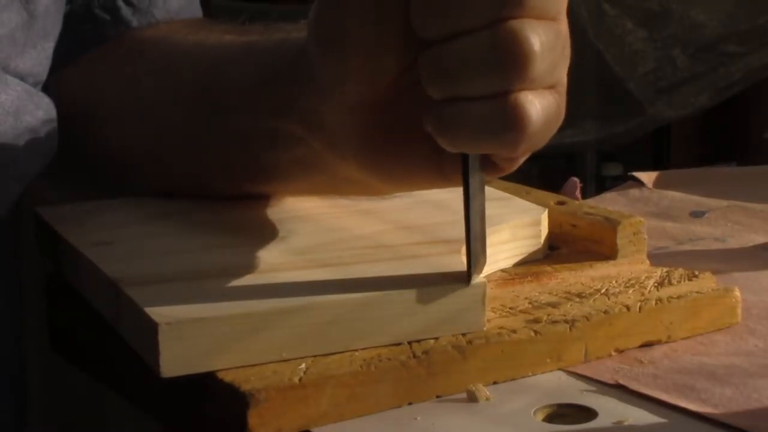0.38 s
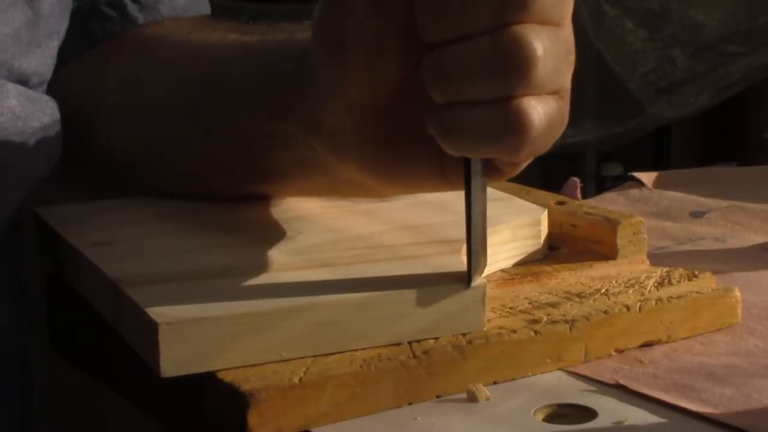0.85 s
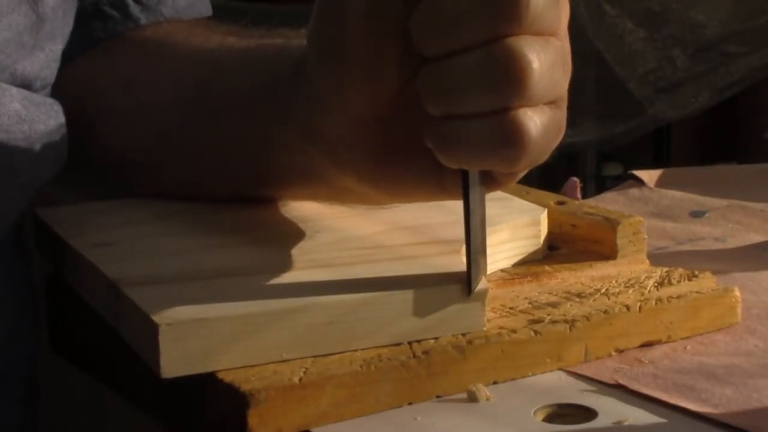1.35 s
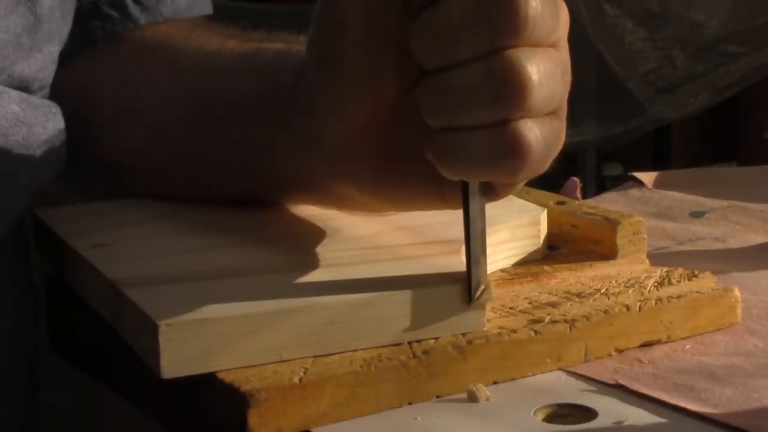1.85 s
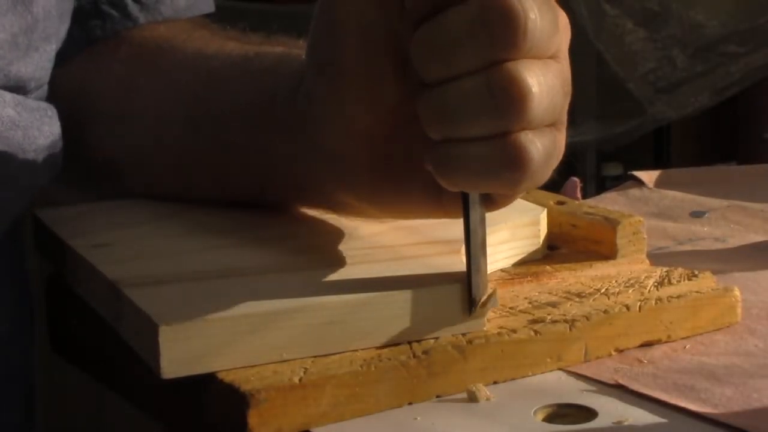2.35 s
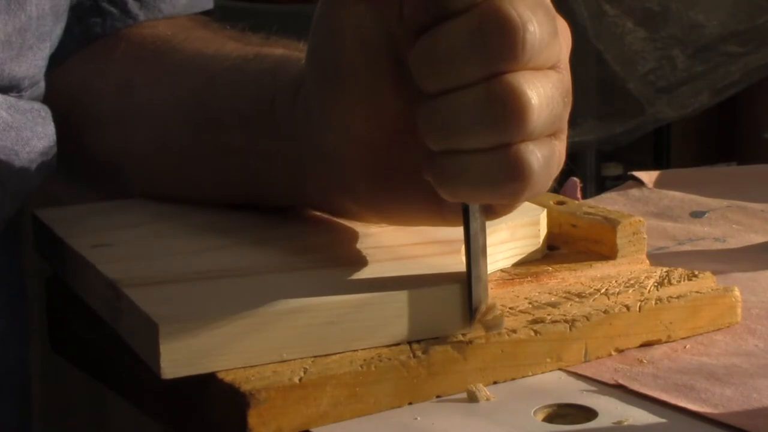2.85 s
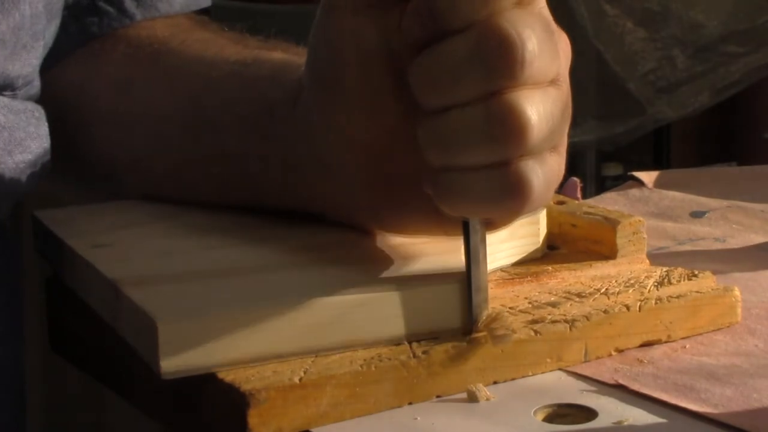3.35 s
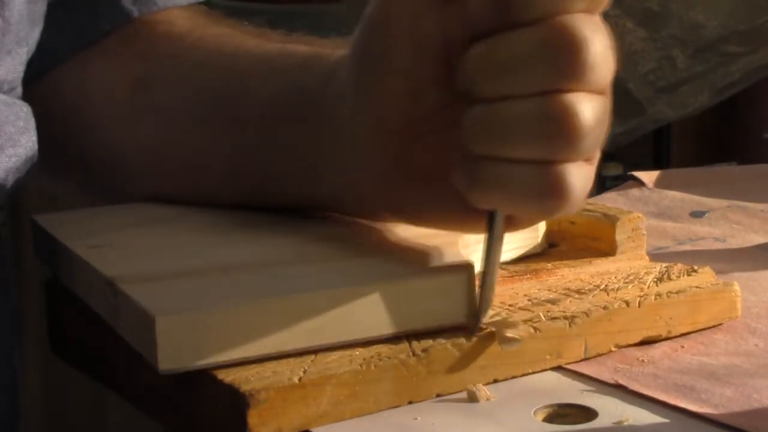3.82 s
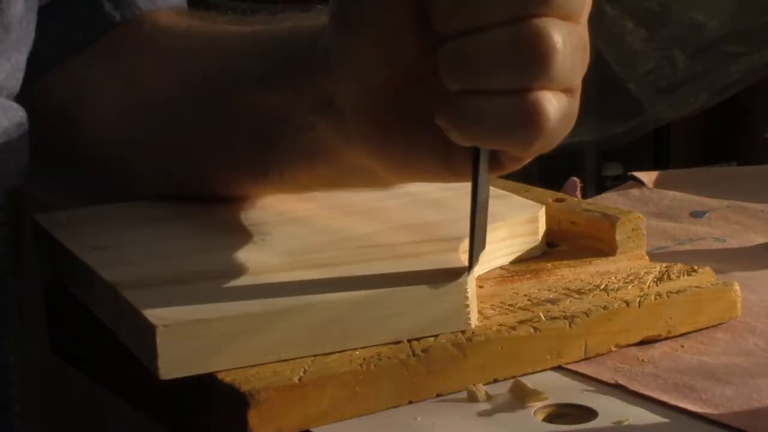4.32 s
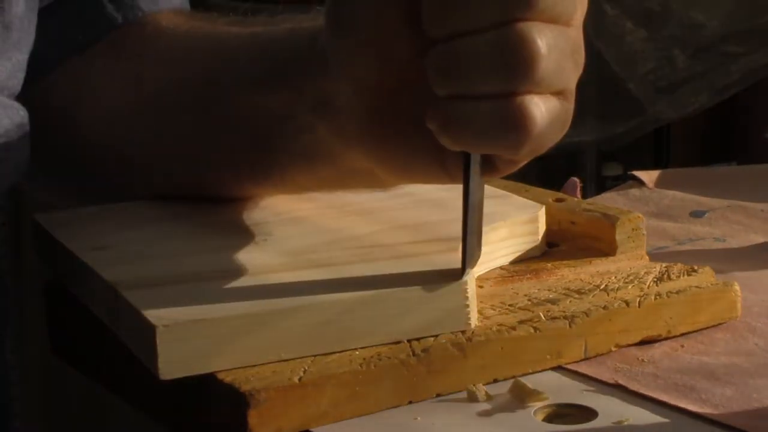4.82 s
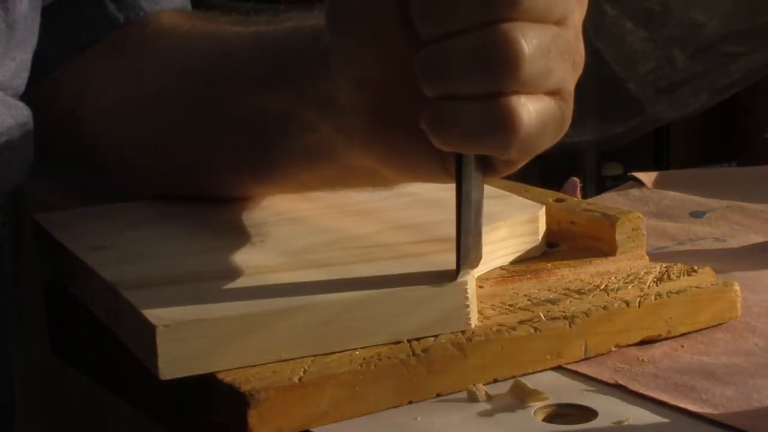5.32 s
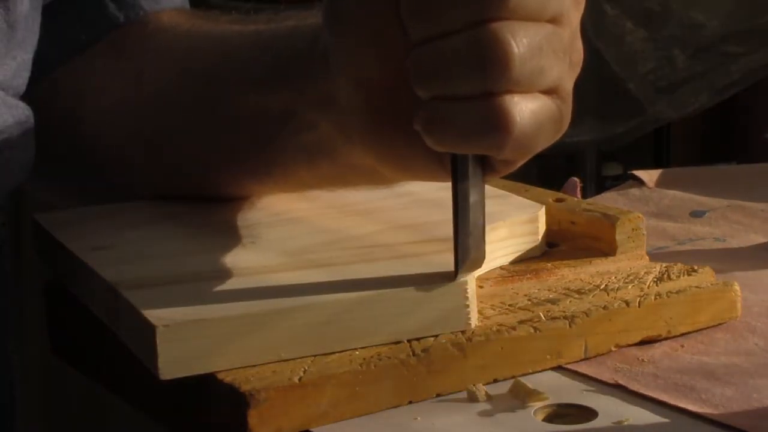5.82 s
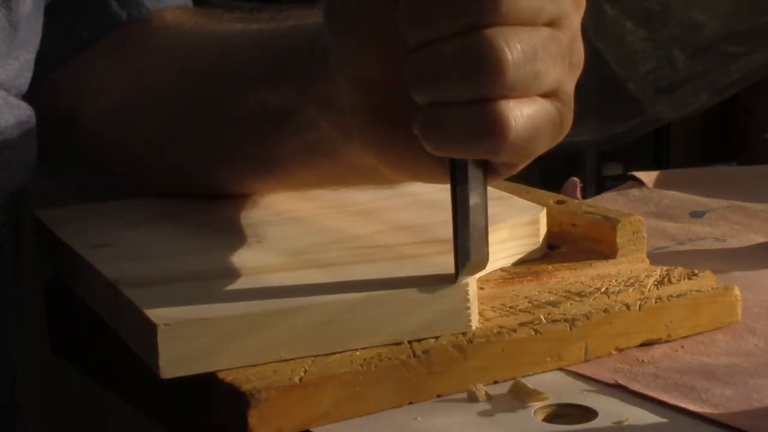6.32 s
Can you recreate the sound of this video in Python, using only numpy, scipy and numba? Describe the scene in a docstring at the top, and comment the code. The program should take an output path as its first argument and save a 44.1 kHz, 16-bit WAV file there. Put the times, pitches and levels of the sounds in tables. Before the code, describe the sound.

Rapid regular chisel blows in a small workshop, loud and compressed, each a dry snap over a knocking bench resonance. They soften slightly and vary in tone as the chisel nears the bottom, with tiny wood clicks between. Then only low rumble, soft hiss and distant motor hum stay, with a brief fluttering wind puff on the close stereo microphone.

```python
"""Mallet and chisel at the bench

A mallet drives a chisel down the corner of a board on a wooden bench: one light tap, then fourteen even blows.
Each blow is a snap of noise, a bench ring of fading sines and a shop boom of fading noise; a limiter holds the
hard blows level. Small wood clicks fall among them. A quiet hiss of shaped noise with a motor hum sinks
underneath, with a low rumble and drone. One strong puff of air thumps on the microphone ports as short
swings in a flutter, with a faint lump before and after."""
import sys
import numpy as np
from scipy import signal
from scipy.fft import rfft, irfft, next_fast_len
from scipy.io import wavfile
from numba import njit

SR = 44100
rng = np.random.default_rng(int(sys.argv[2]) if len(sys.argv) > 2 else 0)


def magnitude_from_level(level_db):
    """Linear magnitude for a level in decibels (20 dB per decade)."""
    exponent = np.asarray(level_db, float) / 20
    return 10 ** exponent


def master_out(mix):
    """Clip the mix to full scale and print it as 16-bit PCM to the path in sys.argv[1]."""
    frames = np.transpose(np.atleast_2d(mix))
    ceiling = np.clip(frames, -1, 1)
    pcm = np.round(ceiling * 32767).astype(np.int16)
    wavfile.write(sys.argv[1], SR, pcm)


N = 294588  # length in samples

# how wide the background sounds: pitch_hz [Hz], side_db [dB, side over mid]
AIR_SIDE = [(60, -13), (110, -16), (200, -15.5), (380, -19.5), (700, -20), (1290, -19.5), (2380, -16),
            (4400, -13), (8120, -9), (15000, -13)]
THROUGH_S = 3.3  # from here the edge lands on the bench hook, and no two blows sound alike


def unit(x):
    """Scales a sound to rms 1."""
    return x / np.sqrt(np.mean(x ** 2) + 1e-20)


def along(points, hz):
    """Reads a curve of (Hz, value) points at any frequency, on a log axis."""
    f, v = np.transpose(points)
    return np.interp(np.log(hz + 1), np.log(f + 1), v)


def noise(gain_db, side, white):
    """Shapes white noise into stereo of rms 1: a common part, and a part of opposite sign in the two ears."""
    hz = np.fft.rfftfreq(white.shape[1], 1 / SR)
    mid_db = gain_db(hz)
    side_db = mid_db + along(side, hz)
    mid, apart = irfft(rfft(white) * magnitude_from_level([mid_db, side_db]), white.shape[1])
    return unit(np.array([mid + apart, mid - apart]))


def rumble(t, drift, white):
    """Low noise with a steady drone; it drops away late on, then creeps back."""
    # colour of the rumble: pitch_hz [Hz], gain_db [dB per Hz, relative]
    rumble_colour = [(24, -96), (40, -43), (86, -1), (194, -3.5), (289, -0.5), (321, -23.5), (404, 5),
                     (444, -2), (700, 0.5), (910, -28.5), (1540, -120)]
    drone_hz, drone_db = 99.5, -8.5  # dB: peak of the drone over the rms of the noise
    lull_s, fall_s, lull_db, return_db_per_s = 4.93, 0.45, -13, 4.5
    drone = magnitude_from_level(drone_db) * np.sin(2 * np.pi * drone_hz * t + 3 * drift)
    low = noise(lambda hz: along(rumble_colour, hz), AIR_SIDE, white)[:, :N] + drone
    since = np.maximum(t - lull_s, 0)
    change_db = lull_db * np.minimum(since / fall_s, 1) + return_db_per_s * since
    return magnitude_from_level(-3 + change_db) * low  # 3 dB under the hiss before the lull


def hiss(t, drift, white):
    """Smooth noise with the faint hum of a far motor: sines at multiples of its turning speed."""
    # colour of the hiss: pitch_hz [Hz], gain_db [dB per Hz, relative]
    hiss_colour = [(180, -24), (300, -4), (320, -9.5), (417, -3), (445, -13.5), (569, -9), (705, -7),
                   (804, -4.5), (932, -7), (1190, -6), (3040, -14), (10200, -31), (13000, -41.5),
                   (15200, -48)]
    # the motor's hum: multiple [of the turning speed], peak_db [dB over the rms of the hiss]
    orders = [(4, -17.5), (5, -15), (6, -10.5), (7, -16), (8, -21), (9, -17.5), (10, -14), (11, -16.5),
              (14, -14), (15, -19.5), (18, -16.5), (19, -13)]
    motor_hz = 59.2  # turns a second
    turn_phase = 2 * np.pi * motor_hz * t + 0.036 * drift
    hum = sum(magnitude_from_level(db) * np.sin(k * turn_phase + k * k) for k, db in orders)
    return noise(lambda hz: along(hiss_colour, hz), AIR_SIDE, white)[:, :N] + hum


def air():
    """The shop's background: rumble and hiss follow one slow level curve."""
    # level of the background: time_s [s], level_db [dB]
    air_level = [(0, -44), (.4, -44), (1.5, -41), (3.5, -50), (4.2, -54), (4.95, -54), (5.3, -56),
                 (6.7, -55)]
    t = np.arange(N) / SR
    white = rng.standard_normal((2, 2, next_fast_len(N)))
    drift = np.cumsum(rng.standard_normal(N)) / np.sqrt(SR)  # random walk of phase
    level_db = np.interp(t, *np.transpose(air_level))
    return magnitude_from_level(level_db) * (rumble(t, drift, white[0]) + hiss(t, drift, white[1]))


def colour(s, db, presence_db, treble_db, band_hz):
    """The tone of one blow, in dB over frequency: a broad tilt and the narrow bands of the blade."""
    # where bass, body, presence and treble are centred: pitch_hz [Hz]
    tone_hz = [150, 600, 3000, 8000]
    # bands that every blow lifts or lacks: pitch_hz [Hz], gain_db [dB]
    blade = [(3100, 0), (4000, -1), (4700, -1), (5450, -4), (7600, 0.5), (10000, 0.5)]
    scatter_db, lift_db = 2, 6.5  # blade bands change from blow to blow; the blow's own band stands out
    if s < THROUGH_S:
        bass_db = 6 - 0.43 * db - 3 * s  # less for hard blows, less as the edge sinks deeper
    else:
        bass_db = 3  # on the bench hook
    tilt = list(zip(tone_hz, [bass_db, 0, presence_db, treble_db]))
    bands = [(c, g + scatter_db * rng.standard_normal()) for c, g in blade] + [(band_hz, lift_db)]

    def tone(f):
        # the half width of a band in Hz is a base plus a share of its centre
        return along(tilt, f) + sum(g * np.exp(-((f - c) / (102 + 0.053 * c)) ** 2) for c, g in bands)
    return tone


def crack(t, colour_db, peak, width, t60):
    """The edge bites fibres: a bright snap of noise climbs to its peak and dies at once (times in s)."""
    # colour of the snap: pitch_hz [Hz], gain_db [dB per Hz, relative]
    crack_colour = [(500, -36.5), (1000, 9.5), (1900, -13), (2800, 0), (3850, -12.5), (8400, -21.5),
                    (10400, -24), (15500, -38.5), (16500, -52)]
    # heard directly, from the centre: pitch_hz [Hz], side_db [dB, side over mid]
    crack_side = [(1000, -31.5), (4000, -28), (12000, -18.5)]
    climb = np.exp(-((t - peak) / width) ** 2)
    fade = magnitude_from_level(-60 * np.abs(t - peak) / t60)
    white = rng.standard_normal((2, len(t)))
    return np.where(t < peak, climb, fade) * noise(lambda hz: along(crack_colour, hz) + colour_db(hz),
                                                   crack_side, white)


def bench_ring(t, tone, change):
    """Bench, board and shop ring as fading sines; a far wall returns the first thud."""
    # ringing modes: pitch_hz [Hz], level_db [dB, relative], t60_s [s to fade by 60 dB]
    modes = [(107.2, -14.5, 0.36), (165.1, -11.5, 0.39), (230.9, -7.5, 0.31), (274.1, -3, 0.3),
             (320, -12.5, 0.48), (351, -3.5, 0.24), (395.4, -8.5, 0.25), (426.7, -1.5, 0.24),
             (451.1, 0, 0.27), (513.7, -6, 0.42), (520, -6.5, 0.3), (583, -9, 0.54), (570, -6.5, 0.1),
             (644.3, 2, 0.19), (689, 7.5, 0.1), (725.8, 6, 0.13), (747, -8, 0.32), (819.3, 1.5, 0.18),
             (891, 0.5, 0.18), (936, -5.5, 0.19), (966, -20, 0.71), (1090, -13.5, 0.23), (1206, -5.5, 0.21),
             (1312, -2, 0.078), (1310, -30.5, 0.067)]
    hz, mode_db, t60 = np.transpose(modes)[:, :, None]
    sign = (-1.0) ** np.arange(len(modes))[:, None]  # neighbours swing opposite ways at the microphone
    strike_db = mode_db + tone(hz) + 4 * change * rng.standard_normal(hz.shape)
    ring = np.sum(sign * magnitude_from_level(strike_db - 60 * t / t60) * np.sin(2 * np.pi * hz * t), axis=0)
    wall_s, wall_db = 0.08, -3.5  # delay, and level before the rise and fade below
    rise_s, fade_t60_s = 0.0061, 0.078  # the return is smeared, and fades faster than the ring itself
    thud = ring * magnitude_from_level(wall_db - 60 * t / fade_t60_s) * (1 - np.exp(-t / rise_s)) ** 2
    return ring + np.pad(thud, (round(wall_s * SR), 0))[:len(t)]


def dying(x):
    """Each frequency fades at the shop's own speed."""
    # fading of the shop: pitch_hz [Hz], t60_s [s to fade by 60 dB]
    shop_t60 = [(80, 0.34), (200, 0.5), (560, 0.37), (1500, 0.4), (4000, 0.34), (10000, 0.34)]
    hz, t, z = signal.stft(x, SR, nperseg=256)
    faded = z * magnitude_from_level(-60 * t / along(shop_t60, hz)[:, None])
    return signal.istft(faded, SR, nperseg=256)[1][:, :x.shape[1]]


def shop_boom(tone, white):
    """The workshop answers a blow with fading noise in the blow's colour."""
    # colour of the boom: pitch_hz [Hz], gain_db [dB per Hz, relative]
    boom_colour = [(24, -81.5), (40, -38.5), (222, -12), (386, -5), (449, -2), (564, -6.5), (624, 2.5),
                   (690, -7), (744, -1), (1010, -11.5), (1290, -12.5), (2140, -20.5), (7750, -44.5),
                   (14500, -66.5), (16500, -89.5)]
    # how wide the boom sounds: pitch_hz [Hz], side_db [dB, side over mid]
    boom_side = [(60, -19), (110, -29.5), (200, -47.5), (380, -29), (700, -25), (1290, -20.5), (2380, -18),
                 (4400, -17.5), (8120, -13.5), (15000, -25.5)]
    return dying(noise(lambda f: along(boom_colour, f) + tone(f), boom_side, white))


def mallet():
    """Each blow snaps at the edge, rings the bench and fills the shop, all in one colour."""
    # blows: start_s [s], strength_db [dB], presence_db [dB over body], treble_db [dB over body],
    # band_hz [Hz, where the blade or board sings]
    blows = [(0.1093, -20, 7, 10.5, 7000), (.427, -3, 1, 7.5, 6550), (0.7105, 6, 1, 1, 7300),
             (.982, 8.5, 0.5, 6, 4900), (1.2481, 6.5, 3.5, 12.5, 5460), (1.5052, 6, -1, 6, 7800),
             (1.76, 5.5, -1.5, 5.5, 4600), (2.015, 5.5, -1, 3.5, 7550), (2.265, 3, 3.5, 6.5, 6960),
             (2.4985, 1.5, -4.5, 0, 6640), (2.735, 1.5, -3, 0, 6500), (2.968, -1.5, 2.5, 7.5, 11500),
             (3.215, -2, -2.5, 2.5, 8750), (3.4581, -1, -1, 0, 2580), (3.702, -1, 4.5, -5.5, 1300)]
    out, t = np.zeros((2, N)), np.arange(2 ** 15) / SR
    same_place = rng.standard_normal((2, len(t)))
    for s, db, presence_db, treble_db, band_hz in blows:
        tone = colour(s, db, presence_db, treble_db, band_hz)
        change = 0.35 if s < THROUGH_S else 1  # share of the shop's answer that is new
        white = np.sqrt(1 - change ** 2) * same_place + change * rng.standard_normal((2, len(t)))
        boom = magnitude_from_level(-11.5) * shop_boom(tone, white)
        ring = magnitude_from_level(-18.0) * bench_ring(t, tone, change)
        body = (1 - np.exp(-t / 0.00058)) ** 2 * (boom + ring)  # soft start
        snap = crack(t, tone, peak=0.0025, width=0.00089, t60=0.019)
        snap_db = min(db - 3, -7.5)  # follows the strength up to the most that the fibres give
        start = round(s * SR)
        out[:, start:start + len(t)] += magnitude_from_level(db) * body + magnitude_from_level(snap_db) * snap
    return out


def ticks():
    """Small wood clicks: the same kind of snap, quieter and shorter."""
    # clicks: start_s [s], level_db [dB, relative]
    clicks = [(.958, -39), (3.0344, -35), (3.536, -36), (3.7905, -37), (3.9307, -34.5)]
    out, t = np.zeros((2, N)), np.arange(2 ** 15) / SR
    for s, db in clicks:
        click = crack(t, np.zeros_like, peak=0.001, width=0.0007, t60=0.016)
        start = round(s * SR)
        out[:, start:start + len(t)] += magnitude_from_level(db - 3.0) * click
    return out


def puff():
    """Air lumps rock each diaphragm for a few cycles, the big ones in a flutter unrelated from port to port."""
    # air lumps: centre_s [s], pitch_hz [Hz], left_db [dB], right_db [dB]
    lumps = [(4.15, 60, -56, -58), (4.619, 140, -43.5, -42), (4.655, 110, -35, -36),
             (4.679, 164, -17.5, -33), (4.688, 330, -37, -41), (4.695, 237, -41, -28.5),
             (4.7, 70, -37, -35), (5.272, 70, -57, -59)]
    # colour of the flutter: pitch_hz [Hz], gain_db [dB per Hz, relative]
    gust_colour = [(25, -20), (60, 1), (200, -8), (330, -9), (500, -38), (800, -120)]
    gust_s, gust_half_s, gust_db = 4.67, 0.048, -42.5  # centre, half length, level at the centre
    white = rng.standard_normal((2, next_fast_len(N)))
    flutter = noise(lambda hz: along(gust_colour, hz), [(100, 0)], white)[:, :N]
    swell = np.exp(-((np.arange(N) / SR - gust_s) / gust_half_s) ** 2)
    out = magnitude_from_level(gust_db) * swell * flutter
    t = np.arange(-4096, 4096) / SR
    for s, hz, left_db, right_db in lumps:
        swing = np.cos(2 * np.pi * (hz * t + rng.random((2, 1))))
        shape = np.exp(-(t * hz / 0.98) ** 2)  # half length 0.98 cycles
        start = round(s * SR) - 4096
        out[:, start:start + len(t)] += magnitude_from_level([[left_db], [right_db]]) * shape * swing
    return out


def scene():
    """Everything that reaches the microphone."""
    return air() + mallet() + ticks() + puff()


@njit
def follow(peak, attack, release):
    """Peak detector: climbs fast, sinks slowly."""
    out, level = np.empty_like(peak), 0.0
    for i in range(len(peak)):
        level += (attack if peak[i] > level else release) * (peak[i] - level)
        out[i] = level
    return out


def roll_off(x):
    """The treble ends steeply here."""
    return signal.sosfilt(signal.butter(12, 16830, fs=SR, output="sos"), x)


def record(dry):
    """One limiter for both channels, then a bass cut; what slips past the attack is rounded off."""
    attack_s, release_s = 0.00079, 0.034
    level = follow(np.abs(dry).max(axis=0), 1 / (attack_s * SR), 1 / (release_s * SR))
    held = dry / (0.5 + (level / 0.66) ** 6) ** (1 / 6)
    cut = signal.sosfilt(signal.butter(2, 85, "high", fs=SR, output="sos"), held)
    rounded = cut / (1 + np.abs(cut / 0.92) ** 8) ** (1 / 8)
    return roll_off(rounded)


dry = scene()
out = record(dry)
master_out(out)
```